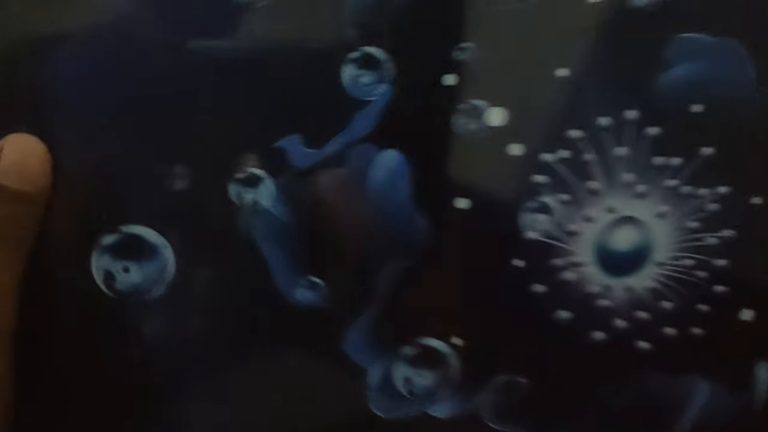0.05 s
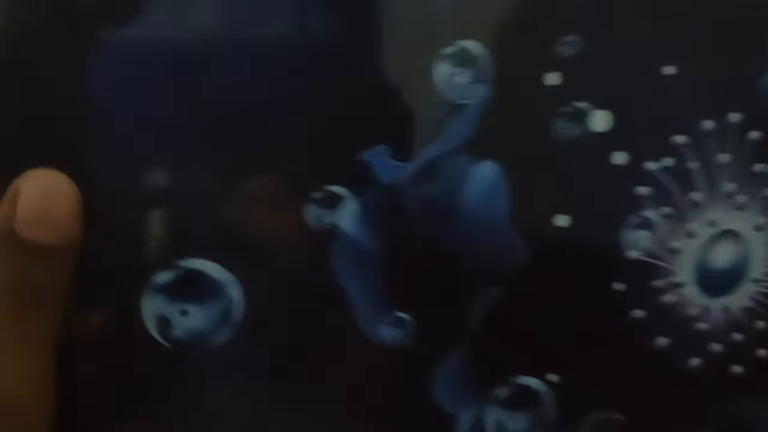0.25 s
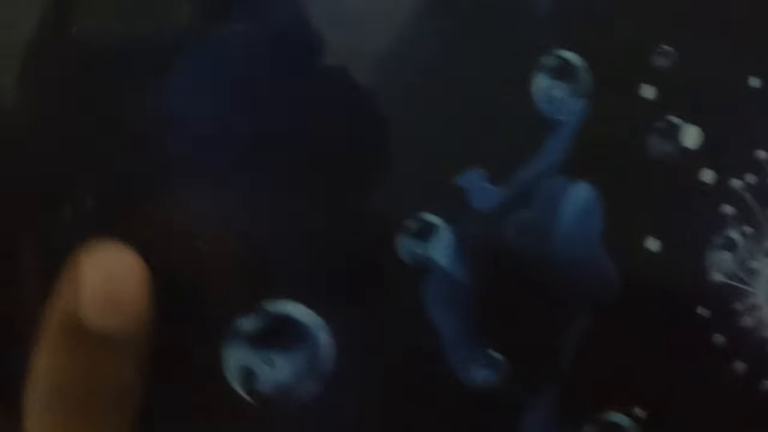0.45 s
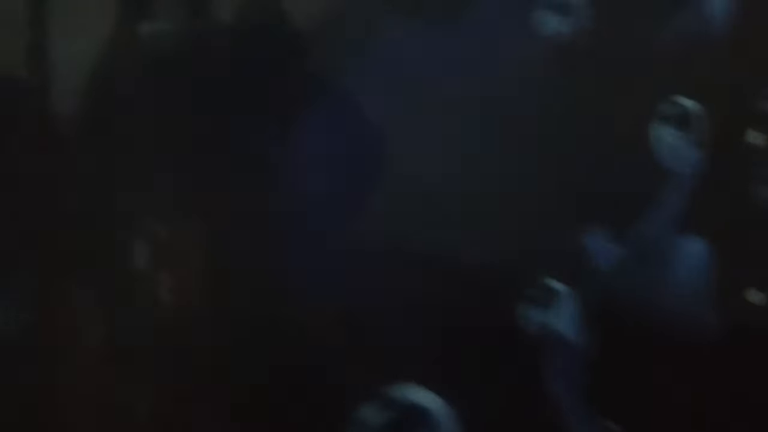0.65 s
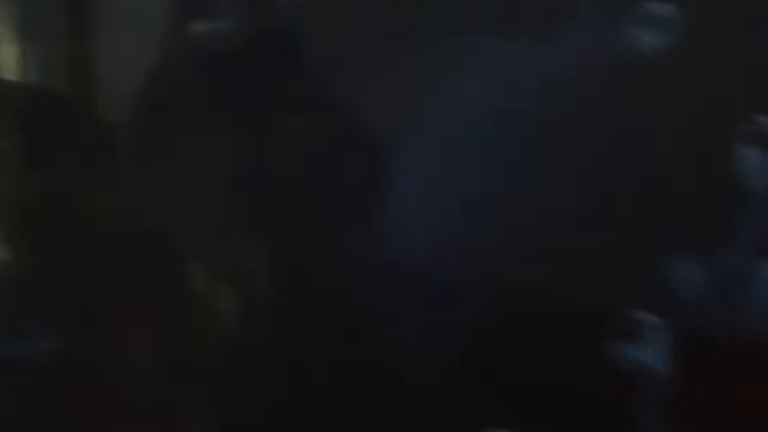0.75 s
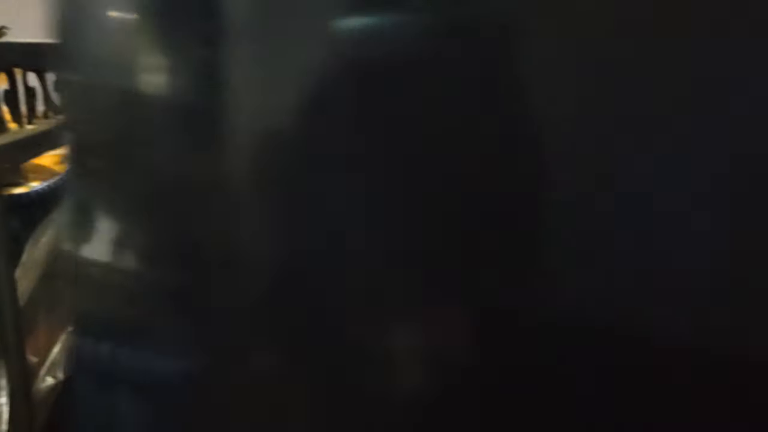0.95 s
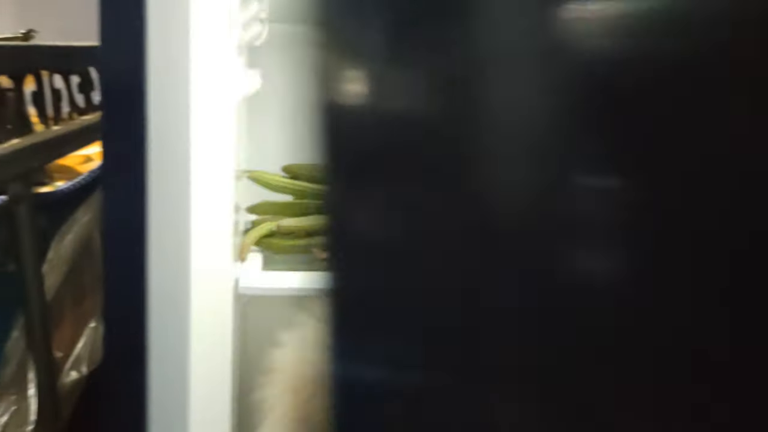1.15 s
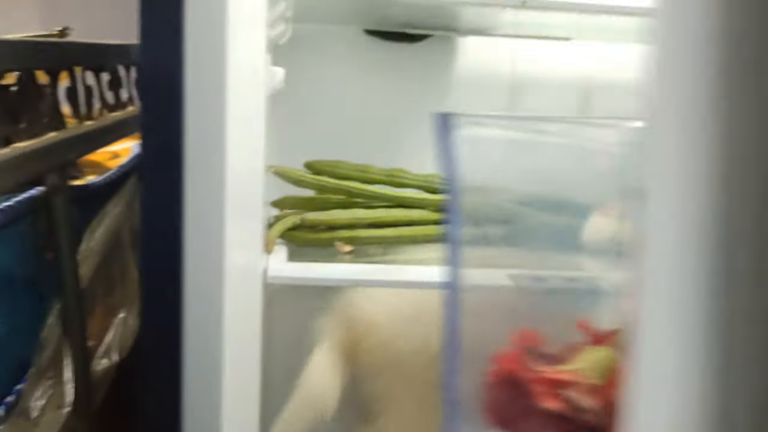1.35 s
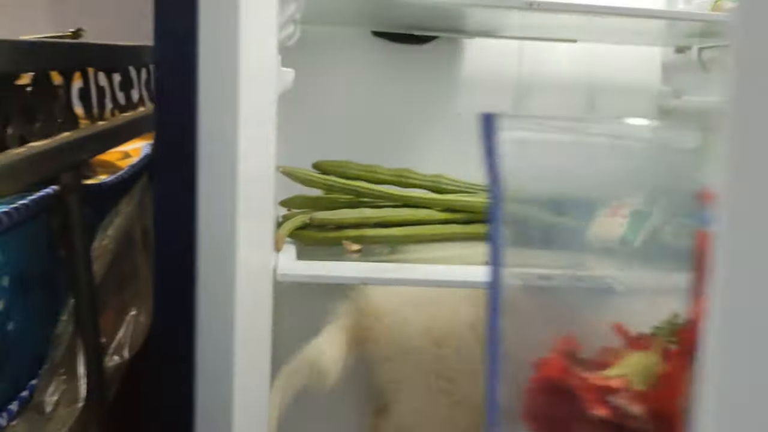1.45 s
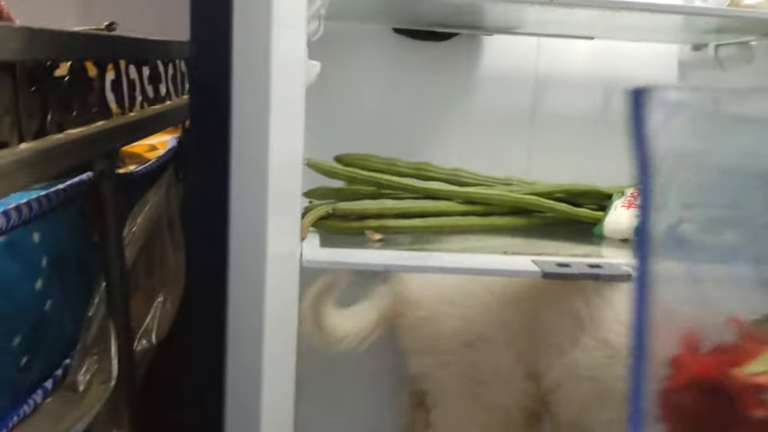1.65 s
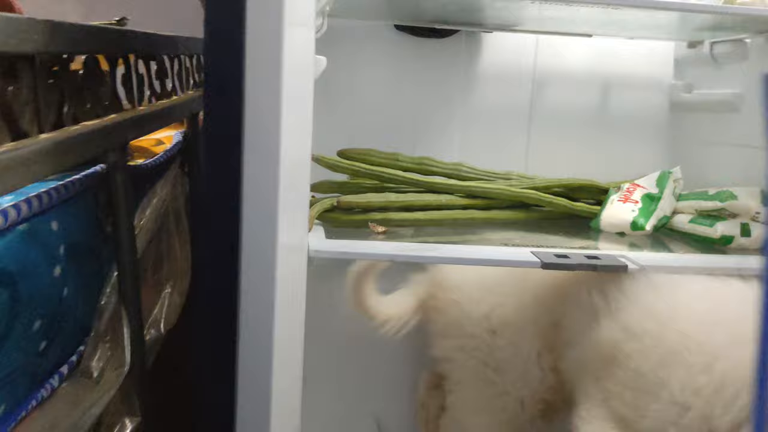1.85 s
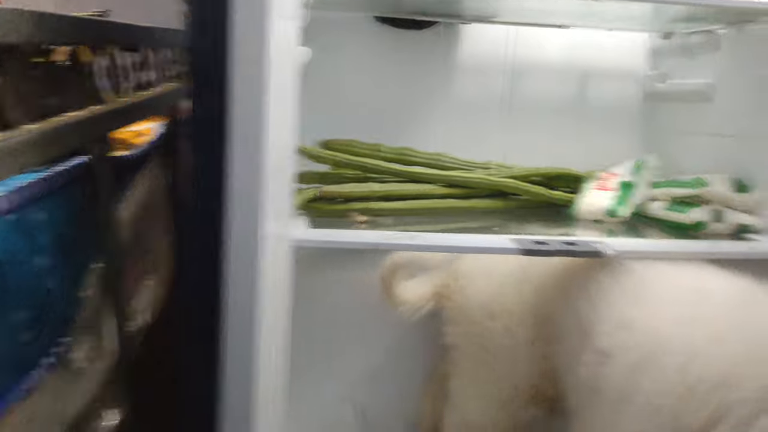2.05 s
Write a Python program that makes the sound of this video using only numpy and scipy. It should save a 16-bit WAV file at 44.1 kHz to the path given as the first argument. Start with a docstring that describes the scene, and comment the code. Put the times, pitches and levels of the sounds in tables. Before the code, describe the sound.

Fridge door opening up close: low thuds, a peeling seal, a bright plastic snap, faint late clicks

```python
"""A small, hard room: a refrigerator door is pulled open close to a two-port microphone.
The seal peels with a hiss and crackles (grainy shaped noise); the cabinet booms (decaying sines, dull noise).
A plastic part pops sharply (noise bursts, ringing modes) and the racks ring on after it (noise tail).
Things in the door knock, click and rustle over a rumble, a low mains hum and a quiet steady noise floor."""
import sys
import numpy as np
from scipy import signal
from scipy.fft import rfft, irfft
from scipy.io import wavfile

SR = 44100
rng = np.random.default_rng(int(sys.argv[2]) if len(sys.argv) > 2 else 0)


def file_out(sig):
    """Save sig as 16-bit WAV at sys.argv[1]."""
    # one column per channel
    cols = np.atleast_2d(sig).T
    # limit, then scale
    lim = np.clip(cols, -1, 1)
    pcm = np.round(lim * 32767).astype(np.int16)
    wavfile.write(sys.argv[1], SR, pcm)


N = 92610
T = np.arange(N) / SR

# All *_COLOUR tables: [f/Hz, relative level/dB]; noise() normalises the total.
# Mains hum partials: [f/Hz, level/dB]
HUM_PARTIALS = [(48.5, -67), (146, -59), (195, -66), (245.5, -56.5), (544, -82)]
# Steady noise floor: [f/Hz, relative level/dB]
FLOOR_COLOUR = [(180, -5.5), (290, 8), (400, -23.5), (640, -34), (950, -25), (1600, -25.5), (2600, -17.5),
                (4100, -37), (6500, -33.5), (7500, -16.5), (8600, -55), (15500, -36)]
FLOOR_DB = -65

# After-ring of the racks: [f/Hz, relative level/dB]
SHELF_COLOUR = [(900, -16.5), (1500, -18.5), (1850, -4.5), (2250, -6.5), (2650, -5.5), (3100, -12),
                (3700, -23), (8000, -41.5)]
SHELF_DB, SHELF_ATTACK_S, SHELF_T60_S = -37, 0.013, 0.42
CHATTER_HZ, CHATTER_DB = 200, 3

# Plastic bag rustle as the door is gripped and swings: [t/s, level/dB]
RUSTLE_LEVEL = [(0.08, -69), (0.6, -76), (1.3, -70), (1.43, -63), (1.55, -65), (1.72, -76), (1.8, -65.5),
                (2.03, -68), (2.1, -63)]
# Rustle: [f/Hz, relative level/dB]
RUSTLE_COLOUR = [(100, -17.5), (400, 6.5), (1000, 3.5), (1400, -6.5), (2400, 3), (3800, -6.5), (7000, -6.5),
                 (13000, -10), (15000, -4.5)]
# Light plastic clicks: [t/s, level/dB, attack/s, t60/s, tilt/(dB/octave)]
CLICKS = [(0.153, -43, 0.00037, 0.043, 6), (1.577, -41, 0.0034, 0.047, -1),
          (1.605, -45.5, 0.0078, 0.15, -7), (1.853, -36, 0.0015, 0.024, -1),
          (1.911, -47, 0.0015, 0.042, 1.5)]
# Clicks before tilt: [f/Hz, relative level/dB]
CLICK_COLOUR = [(300, -5), (1300, -15), (1750, -5.5), (2400, 0), (3200, 1.5), (4000, -13), (5200, -5),
                (9000, -17.5), (15000, -6.5)]

# Dry hollow tock beside the microphone, before panning: [f/Hz, level/dB, t60/s]
TOCK_MODES = [(72, -38.5, 0.23), (800, -40.5, 0.011), (1360, -42, 0.017), (2880, -54.5, 0.0062)]
TOCK_S, TOCK_ATTACK_S, TOCK_PAN_DB = 1.8285, 0.0011, 11

# Stiff plastic mode; tick level is relative to its click
SNAP_S, SNAP_HZ, SNAP_DB, SNAP_ATTACK_S, SNAP_T60_S = 0.8444, 2620, -19.5, 0.0007, 0.024
TICK_HZ, TICK_DB, TICK_T60_S = 3130, -4, 0.011

# Pop, struck twice in quick succession: [t/s, level/dB]
POPS = [(0.8447, -27), (0.848, -31.5)]
# Pop's noise: [f/Hz, relative level/dB]
POP_COLOUR = [(170, -40), (265, -13), (480, -5), (630, -20), (780, 7), (1330, -19), (1900, -1.5), (2750, 7),
              (3870, -17.5), (4900, -6), (6200, -18.5), (15000, -35.5)]
# Plastic modes: [f/Hz, relative level/dB, t60/s]
POP_MODES = [(760, -14, 0.17), (1935, -8, 0.34), (2132, -17, 0.15), (2610, -27, 0.55), (2842, -13, 0.26),
             (4820, -30, 0.06)]
POP_ATTACK_S, POP_T60_S = 0.00069, 0.022
POP_RING_ATTACK_S, POP_RING_DB = 0.00097, -5

# Rumble of the handled door: [t/s, level/dB]
RUMBLE_LEVEL = [(0, -44.5), (0.19, -42.5), (0.25, -39.5), (0.41, -37), (0.52, -45), (0.8, -65.5),
                (1.07, -56.5), (1.14, -52), (1.22, -64), (1.59, -55.5), (1.65, -42.5), (1.77, -56),
                (2.1, -58.5)]
# Rumble: [f/Hz, relative level/dB]
RUMBLE_COLOUR = [(25, -24), (42, -21.5), (65, 7.5), (95, 6), (140, -0.5), (300, -13.5), (480, -30.5),
                 (6000, -110)]
RUMBLE_JOLT_HZ, RUMBLE_JOLT_DB = 35, 3

# Low thumps of door and cabinet: [t/s, level/dB, f/Hz, attack/s, hold/s, t60/s]
THUMPS = [(0.110, -38.5, 192, 0.003, 0.0097, 0.19), (0.2115, -34, 287.7, 0.0024, 0.0067, 0.24),
          (0.231, -23, 238, 0.0073, 0.0015, 0.033), (0.230, -30.5, 132.5, 0.0031, 0.022, 0.12),
          (0.256, -42.5, 320.4, 0.012, 0.073, 0.1), (0.322, -21, 131.3, 0.007, 0.03, 0.086),
          (0.375, -27.5, 240.3, 0.0014, 0.0048, 0.18), (0.377, -21.5, 129, 0.0022, 0.043, 0.085),
          (0.3735, -23, 90.9, 0.02, 0.023, 0.1), (0.471, -25.5, 126.6, 0.031, 0.0056, 0.26),
          (0.566, -42.5, 126.2, 0.0056, 0.11, 0.4), (0.855, -45.5, 277.5, 0.058, 0.011, 0.07),
          (1.611, -38.5, 284.4, 0.011, 0.0016, 0.14), (1.625, -35.5, 137.6, 0.0036, 0.0083, 0.34),
          (1.626, -47, 85, 0.0099, 0.043, 0.17)]
# Dull thuds of the door and things shifting in it: [t/s, level/dB, t60/s, tilt/(dB/octave)]
BUMPS = [(0.233, -41, 0.45, -2.5), (0.378, -31.5, 0.19, -3.5), (1.348, -50, 0.26, 1.5),
         (1.613, -55, 0.38, -7)]
# Thuds before tilt: [f/Hz, relative level/dB]
BUMP_COLOUR = [(60, -15), (200, 4.5), (380, -0.5), (620, -4.5), (950, -11), (2600, -26), (8000, -55)]
BUMP_ATTACK_S = 0.0038

# Seal letting go: [t/s, level/dB, attack/s, hold/s, t60/s]
CRACKLES = [(0.081, -52.5, 0.0015, 0.0094, 0.09), (0.106, -50.5, 0.0046, 0.0089, 0.24),
            (0.163, -50.5, 0.0011, 0.012, 0.06), (0.207, -43.5, 0.013, 0.009, 0.27),
            (0.293, -36.5, 0.00058, 0.012, 0.035), (0.365, -42, 0.0037, 0.0081, 0.039),
            (0.372, -35.5, 0.0048, 0.0026, 0.034)]
# Crackles: [f/Hz, relative level/dB]
CRACKLE_COLOUR = [(150, 3), (330, 9), (470, -6.5), (620, -7.5), (780, 0), (1400, -12.5), (2150, -7.5),
                  (3500, -19.5), (5800, -26.5), (15000, -45.5)]
# Hiss of the peeling seal: [t/s, level/dB]
PEEL_LEVEL = [(0.05, -91), (0.13, -69.5), (0.192, -56), (0.205, -41), (0.213, -47), (0.228, -46.5),
              (0.25, -84.5), (0.275, -68), (0.34, -97)]
# Hiss: [f/Hz, relative level/dB]
PEEL_COLOUR = [(800, -3), (2200, -4), (3800, -4), (5500, 2), (8400, 4.5), (10000, -4.5), (12000, 0.5),
               (15000, -13.5)]
GRAIN_HZ, GRAIN_DB = 600, 4.2  # seal, clicks and rustle

ROOM_T60_S, ROOM_TREBLE_T60_S, ROOM_SPLIT_HZ = 0.32, 0.28, 3500
ROOM_DB, ROOM_ONSET_S = -2.5, 0.0027
WIDE_HZ, LIKENESS = 450, 0.25  # left-right correlation falls from 1 towards LIKENESS above WIDE_HZ

# Balance of the microphone ports: [f/Hz, left-right level/dB]
PORT_BALANCE = [(120, 2.5), (380, -4.5), (750, 2.5), (1400, 0), (2900, 4.5), (13000, 0)]
PORT_LAG_S = 0.00033
TOP_HZ = 15600


def amp(db):
    """Decibels to gain."""
    return 10 ** (np.asarray(db) / 20)


def pan(db):
    """Left and right gains for a left-right difference in dB."""
    return amp(np.array([[db], [-db]]) / 2)


def curve(rows):
    """Gain over time, interpolated in dB."""
    return amp(np.interp(T, *np.array(rows).T))


def envelope(start_s, attack_s, hold_s, t60_s):
    """Linear rise, hold, exponential fall."""
    age_s = T - start_s
    rise = np.clip(age_s / max(attack_s, 1 / SR), 0, 1)
    fall_s = np.maximum(age_s - attack_s - hold_s, 0)
    return rise * np.exp(-np.log(1000) * fall_s / t60_s)


def ring(start_s, hz, attack_s, hold_s, t60_s):
    """One struck resonance: a decaying sine."""
    return envelope(start_s, attack_s, hold_s, t60_s) * np.sin(2 * np.pi * hz * (T - start_s))


def spectrum_gain(points):
    """Gain per bin, interpolated in dB over log frequency."""
    hz, db = np.array(points).T
    bins_hz = np.maximum(np.fft.rfftfreq(N, 1 / SR), 1)
    return amp(np.interp(np.log(bins_hz), np.log(hz), db))


def noise(colour, tilt_db=0):
    """Stereo noise of unit rms and given colour, most alike left and right in the bass."""
    gain = spectrum_gain([(hz, db + tilt_db * np.log2(hz)) for hz, db in colour])
    bins_hz = np.fft.rfftfreq(N, 1 / SR)
    alike = LIKENESS + (1 - LIKENESS) / (1 + (bins_hz / WIDE_HZ) ** 2)
    alike = np.clip(alike, 0, 1)
    white = rfft(rng.standard_normal((2, N)))
    mid, side = white * gain * np.sqrt([1 + alike, 1 - alike])
    y = irfft([mid + side, mid - side], N)
    return y / y.std()


def grains(rate_hz, spread_db):
    """Random catches and slips: a jittering gain of unit power."""
    jitter = np.interp(T, np.arange(N) / rate_hz, rng.standard_normal(N))
    gain = amp(spread_db * jitter)
    return gain / np.sqrt(np.mean(gain ** 2))


def background():
    """Mains hum, a sum of steady sines, over a quiet steady noise floor."""
    hum = 0
    for hz, db in HUM_PARTIALS:
        hum = hum + amp(db) * np.sqrt(2) * np.sin(2 * np.pi * (hz * T + rng.random()))
    return hum + amp(FLOOR_DB) * noise(FLOOR_COLOUR)


def shelves():
    """Racks chatter on after the pop; unsteady noise stands for their many close modes."""
    decay = envelope(POPS[0][0], SHELF_ATTACK_S, 0, SHELF_T60_S)
    return amp(SHELF_DB) * grains(CHATTER_HZ, CHATTER_DB) * noise(SHELF_COLOUR) * decay


def rack():
    """Contents of the door click in noise bursts and rustle in grainy noise."""
    clicks = 0
    for start_s, db, attack_s, t60_s, tilt_db in CLICKS:
        burst = envelope(start_s, attack_s, 0, t60_s)
        clicks = clicks + amp(db) * burst * noise(CLICK_COLOUR, tilt_db)
    rustle = curve(RUSTLE_LEVEL) * noise(RUSTLE_COLOUR)
    return grains(GRAIN_HZ, GRAIN_DB) * (clicks + rustle)


def tock():
    """One short hollow knock with a low thump, right by the left port, without room."""
    modes = sum(amp(db) * ring(TOCK_S, hz, TOCK_ATTACK_S, 0, t60_s) for hz, db, t60_s in TOCK_MODES)
    return pan(TOCK_PAN_DB) * modes


def snaps():
    """The pop and each click begin with a brief ring of a stiff plastic mode, heard directly."""
    snap = amp(SNAP_DB) * ring(SNAP_S, SNAP_HZ, SNAP_ATTACK_S, 0, SNAP_T60_S)
    ticks = 0
    for start_s, db, attack_s, _, _ in CLICKS:
        ticks = ticks + amp(db + TICK_DB) * ring(start_s, TICK_HZ, attack_s, 0, TICK_T60_S)
    return np.array([snap + ticks, snap + ticks])


def pop():
    """A plastic part snaps twice in quick succession: two noise bursts, each ringing the part's modes."""
    bursts, modes = 0, 0
    for start_s, db in POPS:
        bursts = bursts + amp(db) * envelope(start_s, POP_ATTACK_S, 0, POP_T60_S)
        for hz, mode_db, t60_s in POP_MODES:
            modes = modes + amp(db + mode_db) * ring(start_s, hz, POP_RING_ATTACK_S, 0, t60_s)
    return bursts * noise(POP_COLOUR) + amp(POP_RING_DB) * modes


def rumble():
    """The handled door rumbles unevenly: low noise with a jolting level."""
    jolts = grains(RUMBLE_JOLT_HZ, RUMBLE_JOLT_DB)
    return curve(RUMBLE_LEVEL) * jolts * noise(RUMBLE_COLOUR)


def cabinet():
    """Door panel and cabinet boom as struck resonances and thud as dull noise bursts."""
    booms = 0
    for start_s, db, hz, attack_s, hold_s, t60_s in THUMPS:
        booms = booms + amp(db) * ring(start_s, hz, attack_s, hold_s, t60_s)
    thuds = 0
    for start_s, db, t60_s, tilt_db in BUMPS:
        burst = envelope(start_s, BUMP_ATTACK_S, 0, t60_s)
        thuds = thuds + amp(db) * burst * noise(BUMP_COLOUR, tilt_db)
    return booms + thuds


def seal():
    """Sticky rubber peels away by catch and slip: a fine hiss and coarser crackles."""
    bursts = 0
    for start_s, db, attack_s, hold_s, t60_s in CRACKLES:
        bursts = bursts + amp(db) * envelope(start_s, attack_s, hold_s, t60_s)
    crackles = bursts * noise(CRACKLE_COLOUR)
    hiss = curve(PEEL_LEVEL) * noise(PEEL_COLOUR)
    return grains(GRAIN_HZ, GRAIN_DB) * (crackles + hiss)


def from_left(x):
    """Sound from the left reaches the right port a little later."""
    return np.array([x[0], np.roll(x[1], round(PORT_LAG_S * SR))])


def room(x):
    """Direct sound plus a diffuse noise tail whose treble dies sooner."""
    white = rng.standard_normal((2, N))
    lowpass = signal.butter(2, ROOM_SPLIT_HZ, fs=SR, output="sos")
    low = signal.sosfilt(lowpass, white)
    tail = low * envelope(0, ROOM_ONSET_S, 0, ROOM_T60_S)
    tail += (white - low) * envelope(0, ROOM_ONSET_S, 0, ROOM_TREBLE_T60_S)
    tail /= np.sqrt(np.sum(tail ** 2, axis=1, keepdims=True))
    return x + amp(ROOM_DB) * signal.fftconvolve(x, tail, axes=1)[:, :N]


def ports(x):
    """Each port favours different bands."""
    lean = np.sqrt(spectrum_gain(PORT_BALANCE))
    return irfft(rfft(x) * np.array([lean, 1 / lean]), N)


def scene():
    """Door, contents and room together; the tock bypasses the port balance."""
    reverberant = room(seal() + from_left(pop() + rack()))
    direct = cabinet() + rumble() + from_left(snaps())
    return ports(background() + shelves() + direct + reverberant) + tock()


def record(dry):
    """The recorder cuts the top with a steep low-pass."""
    lowpass = signal.ellip(10, 0.2, 80, TOP_HZ, fs=SR, output="sos")
    return signal.sosfilt(lowpass, dry)


dry = scene()
out = record(dry)
file_out(out)
```